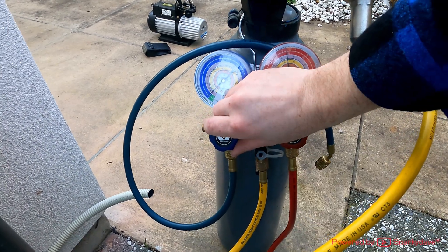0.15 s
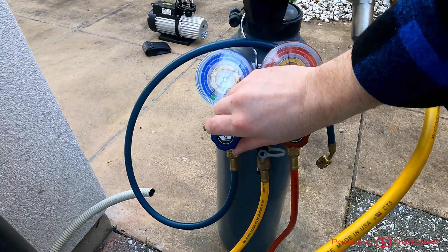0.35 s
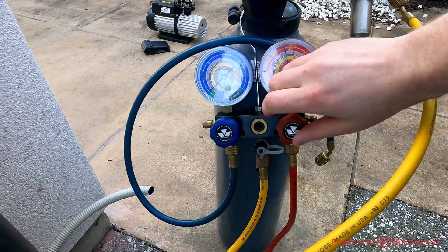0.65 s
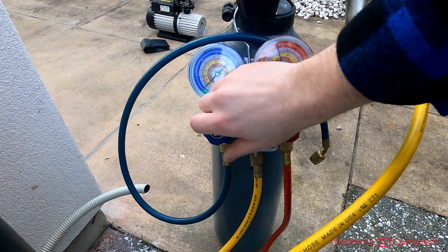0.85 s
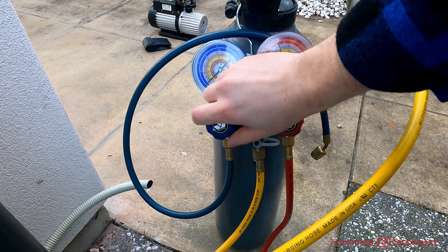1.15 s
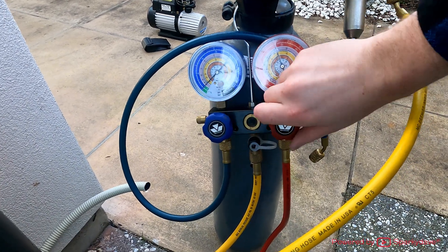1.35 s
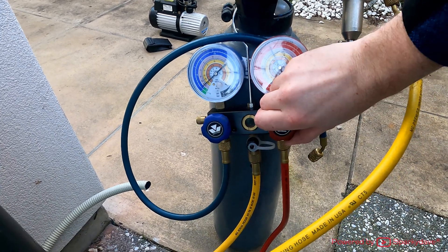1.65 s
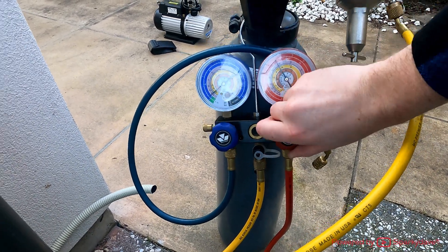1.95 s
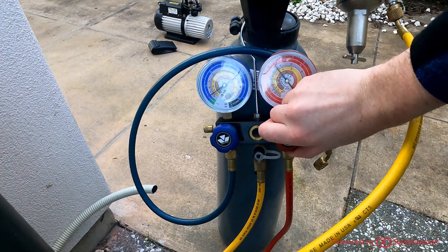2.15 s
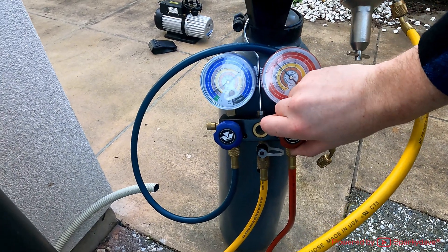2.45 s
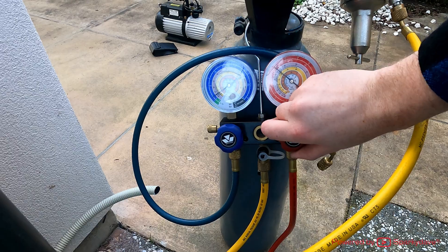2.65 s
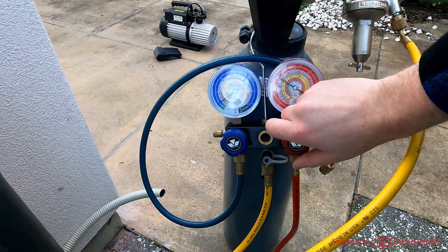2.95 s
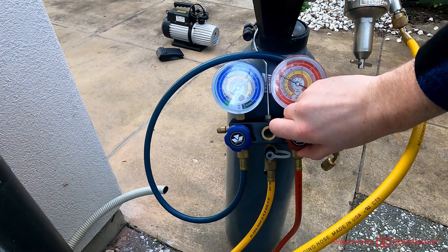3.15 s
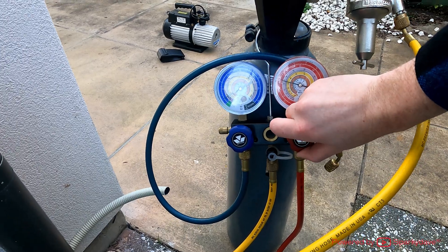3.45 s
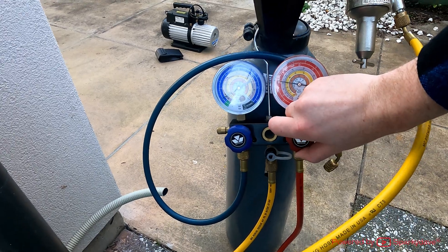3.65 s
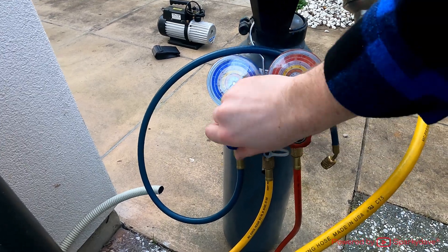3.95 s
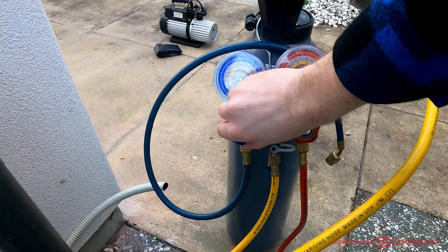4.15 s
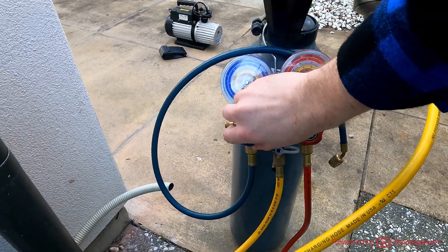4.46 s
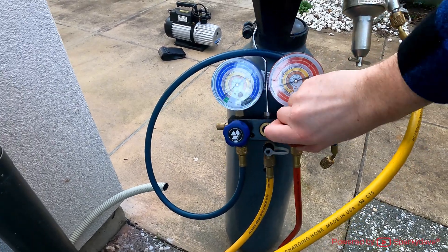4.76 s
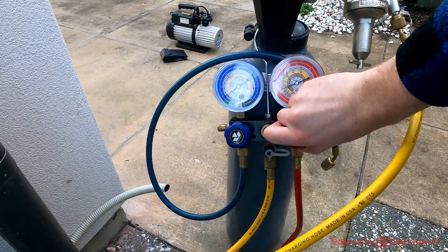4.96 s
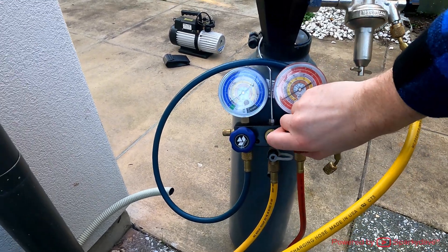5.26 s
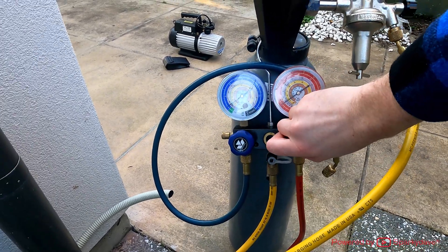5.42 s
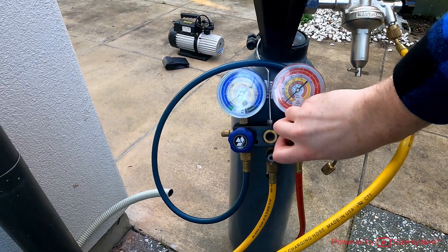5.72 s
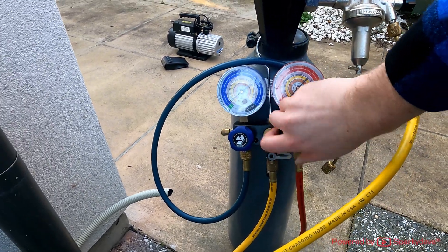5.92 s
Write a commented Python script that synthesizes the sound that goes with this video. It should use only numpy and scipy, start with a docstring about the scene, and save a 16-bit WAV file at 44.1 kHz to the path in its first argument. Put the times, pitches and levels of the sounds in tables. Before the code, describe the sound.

A sputtering gas leak dips almost to nothing, a dull knob tick follows, and the hiss widens into a loud, sustained rush.

```python
"""Nitrogen under pressure hisses through the valves of a gauge manifold, on a concrete yard beside a wall.
The jet is flickering noise filtered by resonant gas passages. The valves are turned by hand: a thin leak with
spurts and one near stop, then a wide, steady jet. A tick of the knob is a sum of decaying modes.
Far traffic and the background floor are bands of wavering noise; a few faint chirps are gliding sines.
Both channels carry one mono sound, with a small difference that is strongest, relative to it, in the treble."""
import sys
import numpy as np
from scipy import signal
from scipy.fft import rfft, irfft, next_fast_len
from scipy.io import wavfile
from scipy.ndimage import uniform_filter1d, map_coordinates

SR = 44100
rng = np.random.default_rng(int(sys.argv[2]) if len(sys.argv) > 2 else 0)


def transcribe(signal):
    """Save signal, clipped to [-1, 1], as a 16-bit WAV file at the path in sys.argv[1]."""
    frames = np.atleast_2d(signal).T
    limited = np.clip(frames, -1, 1)
    pcm = np.round(limited * 32767).astype(np.int16)
    wavfile.write(sys.argv[1], SR, pcm)


def ratio_of_db(decibels):
    """Turn decibels (scalar or array-like) into linear amplitude factors; 0 dB maps to 1."""
    return 10 ** (np.asarray(decibels, float) / 20)


N = 268480  # samples
FRAME = 1024  # samples in a short-time spectrum


def gas():
    """Jet noise: turbulent eddies make broadband noise, whose body and fizz swell apart from its core."""
    # slow random drift: scale of hiss, body, fizz [dB]
    wander_db = 0.34, 0.42, 0.7
    body_sag_share = 0.12  # extra loss of the lower body per dB of pressure sag
    now = np.arange(N) / SR
    drift = [db * wobble(8) for db in wander_db]
    hiss_db = valve(now)[1] + spurts(now)[0] + drift[0]
    flutter = ratio_of_db(0.34 * wobble(25) + 0.28 * wobble(300))
    eddies = flutter * rng.standard_normal(N)

    def gain(hz, t):
        """Spectral balance: the manifold's filter with band changes and random patches."""
        drift_then = [np.interp(t, now, d) for d in drift[1:]]
        body_db, fizz_db = spurts(t)[1:] + drift_then
        in_body = np.clip((3300 - hz) / 500, 0, 1)
        in_fizz = np.clip((hz - 7500) / 1500, 0, 1)
        body = in_body * (body_db - body_sag_share * valve(t)[2])
        fizz = in_fizz * fizz_db
        patches = smooth_field((len(hz), len(t)), 10, 12)
        patchy_db = 0.42 + 1.2 * np.clip((hz - 8000) / 4000, 0, 1)  # the fizz is the most ragged
        return manifold(hz, t) * ratio_of_db(body + fizz + patchy_db * patches)

    return ratio_of_db(hiss_db) * shaped(unit(eddies), gain)


def manifold(hz, t):
    """Cavity resonance: gas passages colour the jet, each with a strength set by the valve opening."""
    # relative spectrum of the bare jet: f/Hz, level/dB per Hz
    jet = [(180, -40), (500, -26), (1100, -18.5), (2000, -14), (4500, -11), (5800, -12), (7000, -22.5),
           (8500, -32), (9400, -28.5), (10300, -32), (11500, -42), (12700, -55), (13500, -45), (15000, -54),
           (15300, -62), (15700, -72)]
    # gas passages: f/Hz before the creep, width/Hz, gain over the jet/dB at openings 0 leak,
    # 1 half open, 2 open, 3 wide, 4 widest
    passages = [(1115, 440, 1.5, 0.5, -2.1, -2.1, -2), (1500, 830, -5, -2, -6.5, -6.5, -4),
                (2013, 353, 0.5, 5.5, 6.5, 5.5, 5.5), (2510, 340, -5.5, 0.5, 4.5, 6.5, 1.5),
                (2905, 210, 0.5, 1.5, -1.5, -3, -2), (3260, 400, -4, -3, -2, 2.5, 1.4),
                (3672, 220, 8.5, -5.5, 1.5, 7.5, 5.5), (4240, 445, 9, 5.5, 7.5, 7, 3.5),
                (4420, 330, -7, 5, 4.5, 3.5, 6), (4630, 270, 10.5, 5.5, 7.5, 0, -6),
                (5137, 400, 0.5, 8.5, 1.5, -.4, 4), (5466, 334, 3.5, 3, 7.5, 9.5, 10.5),
                (5750, 300, 1.8, 6.5, -.6, -3, -8), (6110, 325, 5.5, 4.5, 4.5, 4.5, 3.5),
                (6566, 263, 8.5, 6.5, 7.5, 6.5, 5.5), (7140, 330, 11, 9, 5.5, 3.5, 4.5),
                (7560, 560, 2.5, 0.5, 2.5, 6, -2), (8260, 580, 0, 1, -2.1, -.3, -1.5),
                (10090, 900, 3.5, 3, 2, 3.5, 3), (10650, 870, 5, 7, 6.5, 5.5, 5.5),
                (11890, 900, -.4, 6, 5.5, 4.3, 5), (12900, 900, 7, 5, -3, -3, 3),
                (14630, 900, 5, 3, 9.5, 10, 6)]
    # narrow, rising whistle of the valve seat: same columns
    seats = [(5396, 110, -8, -2.1, 10.5, 7.7, 8)]
    creep_from_s, passage_creep, seat_creep = 2.25, 0.0054, 0.013  # upward pitch creep, share per s
    opening = valve(t)[0]
    since = np.clip(t - creep_from_s, 0, None)
    power = ratio_of_db(-8) ** 2  # share of the jet that passes unresonated
    for table, creep in (passages, passage_creep), (seats, seat_creep):
        for centre_hz, width_hz, *gains_db in table:
            gain_db = np.interp(opening, range(len(gains_db)), gains_db)
            power = power + resonance(hz, centre_hz * (1 + creep * since), width_hz, gain_db)
    gain = ratio_of_db(along(jet, hz)) * np.sqrt(power)
    core = (hz[:, 0] > 3500) & (hz[:, 0] < 7500)
    core_rms = np.sqrt(np.sum(gain[core] ** 2, 0) / len(hz))
    return gain / core_rms  # the hiss level is that of the core


def valve(t):
    """Throttling: gives opening, hiss level and its sag; each turn takes over from the one before."""
    # turns of a knob: start t/s, turning time/s, hiss level once turned/dB,
    # sag as the pressure behind it drops/dB per s, opening (above 4 acts as 4)
    turns = [(-.1, 0.055, -27, 11, 0), (.585, 0.027, -31.5, 3.5, 0.35), (1.609, 0.092, -25, 3.5, 1.1),
             (2.11, 0.055, -23, 2, 2), (3.18, 0.098, -23, 3, 3), (4.1, .04, -24, 3.5, 4),
             (4.77, 0.11, -24, 1, 6)]
    start, turning, level_db, sag_db, opening = np.transpose(turns)[:, :, None]
    progress = np.clip((t - start) / turning, 0, 1)
    share = -np.diff(np.vstack([progress, 0 * t]), axis=0)
    sagged_db = np.sum(share * sag_db * (t - start - turning), 0)
    return np.sum(share * opening, 0), np.sum(share * level_db, 0) - sagged_db, sagged_db


def spurts(t):
    """Unsteady flow: as the stem moves, hiss, body and fizz change briefly, in dB."""
    # spurts and falters: t/s, half length/s, hiss change/dB, extra change of body/dB, of fizz/dB
    changes = [(.02, 0.094, 1, 1.5, 3), (0.135, 0.067, -2, 2, 4), (0.304, 0.17, 1.5, 2.2, 2),
               (0.525, 0.071, -1, -2.5, 0), (0.627, 0.051, 3, 0, 2), (.88, .14, 0.3, -1.8, -1),
               (1.025, 0.047, -11, 1.5, -1), (1.241, 0.03, 5, .6, 1.5), (3.897, 0.036, 2, -2.5, -2),
               (4.093, .03, -1, -4, -2), (4.14, 0.036, 1.5, -2, -2), (4.618, .2, 0, -1, 1),
               (5.647, 0.11, 1.5, -0.5, -0.5), (6.1, .3, -2.5, 1, 3)]
    return sum(np.array(db)[:, None] * bump(t, s, half) for s, half, *db in changes)


def knob():
    """Modal decay: a valve knob breaks loose with a dull plastic tick of damped sines."""
    # knob modes: f/Hz, level before the soft onset/dB, time to decay by 60 dB/s
    modes = [(1253, -34, .07), (1840, -42, .05), (2380, -31, .05), (2850, -40, .04)]
    slip_s, onset_s = 1.229, 0.0018
    out, t = np.zeros(N), np.arange(SR // 10) / SR
    ring = sum(ratio_of_db(db - 60 * t / t60) * np.sin(2 * np.pi * hz * t) for hz, db, t60 in modes)
    out[round(slip_s * SR):][:len(t)] = ring * (1 - np.exp(-t / onset_s))
    return out


def chirps():
    """Frequency modulation: short falling whistles with soft ends and a rough pitch."""
    # brief far chirps, perhaps a small bird: middle t/s, start f/Hz, end f/Hz, length/s, peak level/dB
    calls = [(.877, 3900, 3500, .025, -35), (1.187, 3750, 3570, .025, -35), (1.438, 4000, 3850, .025, -35),
             (1.58, 3040, 3030, .03, -36)]
    out = np.zeros(N)
    for s, start_hz, end_hz, length, db in calls:
        waver_hz = 25 * wobble(150)
        n = round(length * SR)
        pitch_hz = np.linspace(start_hz, end_hz, n) + waver_hz[:n]
        tone = np.sin(2 * np.pi * np.cumsum(pitch_hz) / SR)
        out[round(s * SR) - n // 2:][:n] += ratio_of_db(db) * np.hanning(n) * tone
    return out


def traffic():
    """Filtered noise: a far engine drone, a deeper rumble and the background floor, each wavering."""
    # slow changes of the traffic, which sinks unevenly and partly returns, before swells and wavering:
    # t/s, drone level/dB, rumble level/dB
    slow_levels = [(0, -60.5, -59), (.6, -61, -66), (1.6, -61, -61), (2.6, -66, -68), (3.1, -65.5, -65),
                   (3.7, -68, -76.5), (4.6, -64.5, -68.5), (6.09, -64, -72)]
    # the drone swells: t/s, half length/s, rise/dB
    revs = [(0, 0.24, 9), (0.684, 0.11, 9), (1.103, 0.084, 6.5), (1.522, 0.21, 9.5), (2.2, 0.11, 2),
            (3.12, .2, 7)]
    # relative spectrum of the drone: f/Hz, level/dB per Hz
    drone = [(90, -22), (125, -7.5), (160, -4), (200, -7.5), (260, -25), (400, -60)]
    # relative spectrum of the rumble: f/Hz, level/dB per Hz
    rumble = [(12, -33), (20, -9), (50, -10.5), (110, -3.5), (150, -20), (250, -60)]
    # relative spectrum of the floor, street wash below and microphone hiss at the top: f/Hz, level/dB per Hz
    floor = [(120, -43), (220, -3), (450, -7.5), (700, -1.5), (1000, -13), (3000, -29), (9000, -45),
             (11000, -38), (15000, -38), (16000, -60)]
    mean_floor_db, floor_follows = -54.5, 0.4  # mean level, share of the drone's slow level change
    t = np.arange(N) / SR
    times_s, *levels_db = np.transpose(slow_levels)
    slow_drone_db, slow_rumble_db = [np.interp(t, times_s, db) for db in levels_db]
    swells_db = sum(db * bump(t, s, half) for s, half, db in revs)
    drone_db = slow_drone_db + swells_db + 1.4 * wobble(6.02)
    rumble_db = slow_rumble_db + 1.4 * wobble(3.86)
    floor_db = mean_floor_db + floor_follows * (slow_drone_db - slow_drone_db.mean()) + 1.2 * wobble(5)
    return ratio_of_db(drone_db) * coloured(drone) + ratio_of_db(rumble_db) * coloured(rumble) + ratio_of_db(floor_db) * coloured(floor)


def resonance(hz, centre_hz, width_hz, db):
    """Resonance: power of one steep-sided peak, a squared Lorentzian 6 dB down at the edges of its width."""
    return (ratio_of_db(db) / (1 + (2 * (hz - centre_hz) / width_hz) ** 2)) ** 2


def coloured(spectrum):
    """Spectral shaping: steady noise of rms 1 with the given spectrum."""
    m = next_fast_len(N)
    white = rfft(rng.standard_normal(m))
    gain = ratio_of_db(along(spectrum, np.fft.rfftfreq(m, 1 / SR)))
    return unit(irfft(white * gain, m)[:N])


def shaped(x, gain):
    """Time-varying filtering: x times a gain over frequency (rows) and time (columns)."""
    hz, t, z = signal.stft(x, SR, nperseg=FRAME, noverlap=FRAME * 3 // 4)
    return signal.istft(z * gain(hz[:, None], t), SR, nperseg=FRAME, noverlap=FRAME * 3 // 4)[1][:N]


def smooth_field(shape, bins, frames):
    """Local averaging: random patches of rms 1, correlated over frequency bins and time frames."""
    field = uniform_filter1d(rng.standard_normal(shape), size=bins, axis=0)
    return unit(uniform_filter1d(field, size=frames, axis=1))


def wobble(rate):
    """Random modulation: a smooth curve through random knots, rate of them a second."""
    return map_coordinates(rng.standard_normal(int(N * rate / SR) + 4), [np.arange(N) * rate / SR])


def bump(t, s, half):
    """Raised-cosine envelope: a smooth rise and fall, 1 at s."""
    return np.cos(np.pi / 2 * np.clip((t - s) / half, -1, 1)) ** 2


def along(points, hz):
    """Logarithmic pitch scale: (f/Hz, value) points joined on a log axis."""
    f, v = np.transpose(points)
    return np.interp(np.log(hz + 1), np.log(f + 1), v)


def unit(x):
    """Power normalisation: x scaled to rms 1."""
    return x / np.sqrt(np.mean(np.abs(x) ** 2) + 1e-20)


def scene():
    """Superposition: all sources add at the one microphone, which feeds both channels."""
    return np.tile(gas() + knob() + traffic() + chirps(), (2, 1))


def top_cut(x):
    """Nothing passes above the cut-off."""
    return signal.sosfilt(signal.butter(12, 15640, fs=SR, output="sos"), x)


def record(dry):
    """Interference and saturation: the housing notches the treble, peaks are rounded, a small side signal is added."""
    # side signal (half the channel difference) where present: f/Hz, level relative to the sound/dB
    unlike = [(30, -20), (300, -3.5), (1000, -14), (3000, -29), (6000, -32), (8000, -10.5), (11000, -8),
              (12000, 0.5), (15500, 3)]
    notched = shaped(dry[0], lambda hz, t: np.sqrt(np.clip(1 - resonance(hz, 9035, 650, -.1), 0, 1)))
    mid = notched / (1 + np.abs(notched / .36) ** 5) ** (1 / 5)  # rounds peaks towards 0.36
    hz, t, z = signal.stft(mid, SR, nperseg=FRAME)
    spells = np.interp(t, np.arange(N) / SR, wobble(5) + .6 * wobble(20))
    scraps = smooth_field(z.shape, 14, 3)
    # below 11.2 kHz the difference is 30 dB weaker except in random spells
    absent_db = -30 * ((hz[:, None] < 11200) & (spells + .6 * scraps < .8))
    random_phase = np.exp(2j * np.pi * rng.random(z.shape))
    scatter = random_phase * ratio_of_db(along(unlike, hz)[:, None] + absent_db)
    side = signal.istft(z * scatter, SR, nperseg=FRAME)[1][:N]
    return top_cut(np.array([mid + side, mid - side]))


dry = scene()
out = record(dry)
transcribe(out)
```